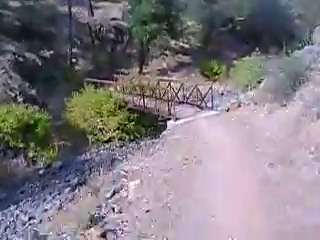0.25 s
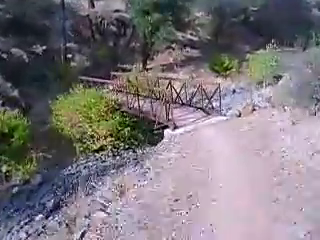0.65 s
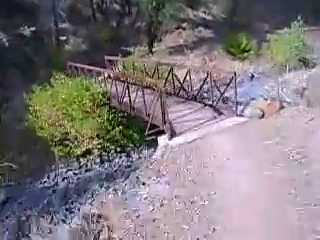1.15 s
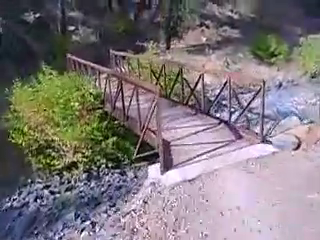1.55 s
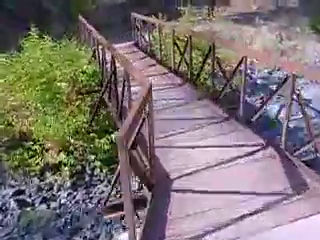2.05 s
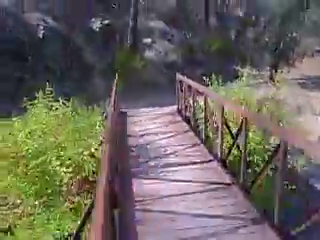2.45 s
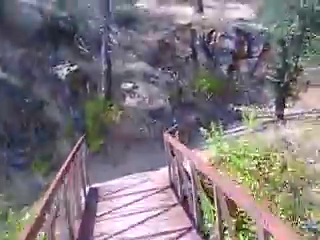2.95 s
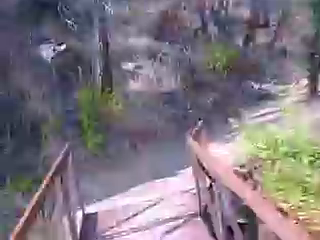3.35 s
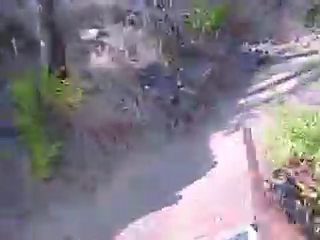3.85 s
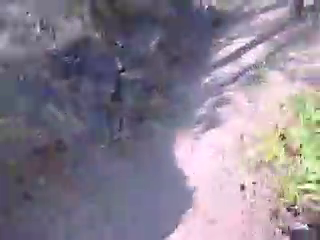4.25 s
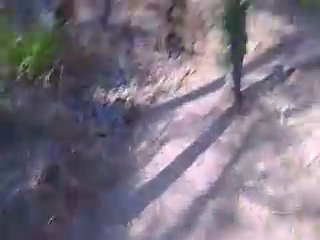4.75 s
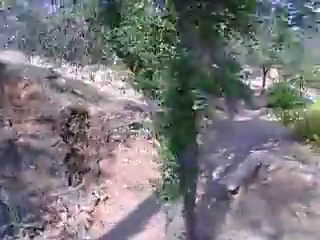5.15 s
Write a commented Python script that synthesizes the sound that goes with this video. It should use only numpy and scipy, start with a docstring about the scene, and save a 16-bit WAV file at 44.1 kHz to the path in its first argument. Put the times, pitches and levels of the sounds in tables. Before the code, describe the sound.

Heard close up outdoors from a rider's microphone, low wind buffeting runs under the gritty rumble of mountain bike tyres. A few brief, faint brake squeals and popping pebbles give way to two heavy, slightly distorted thumps as the wheels hit a plank bridge. The bike crosses with a hollow roar and irregular metallic chain clacks, bumps lightly twice more, and rolls on more quietly over dirt.

```python
"""A mountain bike in the open air, heard close up from the microphone of the rider's camera.
It rolls down a gravel path, tyres rumbling and crunching, stones snapping; the brake pad squeals briefly.
At 2.4 s it thumps onto a plank bridge, wheel after wheel, then crosses with the chain slapping the frame
and the span booming below. Near 4.7 s come two lighter thumps, and it runs out on dirt.
Wind buffets the microphone all the way; the camera sounds dull and overloads on the big blows."""
import sys
import numpy as np
from scipy import signal
from scipy.io import wavfile

SR = 44100
rng = np.random.default_rng(int(sys.argv[2]) if len(sys.argv) > 2 else 0)


def unload_audio(sound):
    """Save the sound as a 16-bit wav file, at the path given as the first command line argument."""
    columns = np.transpose(np.atleast_2d(sound))
    # keep every value between -1 and 1, then stretch to whole-number steps
    steps = np.round(np.clip(columns, -1, 1) * 32767)
    wavfile.write(sys.argv[1], SR, steps.astype(np.int16))


N = 238882

# Levels in the tables are relative; each source sets its own gain.
# tyre spectra (slow rumble, fast rumble, roar, crushed grit): f/Hz, level/dB
SLOW_RUMBLE = [(110, -22.5), (170, -1), (260, 1.5), (340, -3), (480, -4), (640, -8), (850, -18.5),
               (1500, -31)]
FAST_RUMBLE = [(130, -29.5), (200, -10), (270, -3), (350, -2), (480, -5), (640, -7), (850, -5), (1500, -26)]
ROAR_SPECTRUM = [(450, -20.5), (680, -5), (880, -2.5), (1080, -6), (1350, -9.5), (1700, -10), (2300, -18.5),
                 (3500, -26)]
GRIT_SPECTRUM = [(900, -23), (1500, 3.5), (2100, 5.5), (2800, 5), (3800, 4), (5200, 4.5), (6000, -1)]
# resonances of the singing tyre: f/Hz, level/dB, t60/s
SONG_MODES = [(833, -4, 0.028), (939, 0, 0.032), (1116, -1.5, 0.028)]
# how hard the bike rolls (braked on the slope, let go to the bridge, easing on dirt): t/s, level/dB
EFFORT = [(0, -9), (.6, -9), (1.0, -14), (1.8, -12.5), (2.27, -7), (2.55, 0.5), (3.2, -0.5), (4.1, 2),
          (4.3, -4.5), (4.78, -2), (5.15, -9.5), (5.4, -5)]
# the tyres drum louder and higher with speed: t/s, level/dB, share of fast rumble/0-1
DRUMMING = [(0, -22, 0.5), (.8, -23, 0.05), (1.8, -22, 0.22), (2.05, -17.5, .3), (2.6, -15.5, 0.9),
            (3.1, -17, 0.94), (4.25, -14, 0.9), (4.55, -17.5, 0.96), (5.0, -18, 0.8), (5.4, -20, 0.84)]
# bumps press the tyres down (+), crests unload them (-): middle t/s, length/s, load/dB
BUMPS = [(.44, 0.17, -4.5), (0.499, 0.038, 4.5), (1.0, .07, -1.5), (1.094, .12, 3), (1.716, 0.085, 5.5),
         (2.698, 0.2, 6), (2.854, .13, 5.5), (2.988, 0.1, -5), (4.277, 0.14, -2.5), (4.395, 0.063, 3.5),
         (4.497, 0.1, -2.5), (4.576, 0.12, 2.5), (5.252, 0.12, -4.5), (5.302, 0.087, 2)]
# wheels hit the bridge and bumps: t/s, level/dB, base t60/s
WHEEL_HITS = [(2.441, 7, 0.066), (2.456, 3, 0.03), (2.617, -8, 0.078), (2.640, 1.5, 0.066),
              (2.65, 5, 0.056), (2.851, -11.5, 0.077), (4.64, -10.5, 0.078), (4.673, -5.5, 0.037)]
# modes of deck and wheel: f/Hz, level/dB, t60/base t60
DECK_MODES = [(275, -18, 1.2), (323, 0, 1.17), (363, -1, 0.49), (406.6, -1.5, 1.54), (462, -2, 0.83),
              (553, 0, 1.04), (649.5, -9.5, 3.1), (706, -2, 0.77), (940, -26, 0.67), (1102, -9, 2.3),
              (1210, -8, 1.04)]
# chain and fittings strike the frame: t/s, level/dB, favoured f/Hz, ring offset/dB
CHAIN_SLAPS = [(2.443, 7, 1960, -19), (2.4653, 2, 1380, -6.5), (2.615, -1, 1460, -8.5),
               (2.6382, 5, 1420, -9), (2.7352, -3, 1660, -8), (2.824, -12, 1700, -4),
               (2.8642, -1, 1430, -6), (2.9232, -12, 2280, 3), (3.0643, -3, 2050, 7), (3.0714, 0, 1570, -5),
               (3.1731, -4, 1450, -2), (3.186, -7, 1500, -6), (3.235, 0.5, 1600, -1),
               (3.2815, -6, 1880, -3), (3.451, -2, 1580, -8.5), (3.511, 5, 3240, -12),
               (3.712, -1, 1560, -4), (3.76, -1.5, 1630, -1.5), (3.8297, -8, 1540, -15),
               (3.9426, -4, 1610, -3), (4.089, -3, 1450, -15), (4.386, -5.5, 1500, -4.5),
               (4.4606, -7.5, 1530, -4), (4.537, -6.5, 1870, -17), (4.64, -10, 1510, 0.5),
               (4.692, -2, 1380, -13), (4.806, -9, 2030, -6)]
# modes of frame and drive: f/Hz, level/dB, t60/s
FRAME_MODES = [(830, 6, 0.094), (1266, 6, 0.058), (1570, -2, 0.041), (1820, -4, 0.052), (2070, -1, .045),
               (2310, -1, .04), (2900, -15, 0.064), (3330, -8.5, 0.028), (3850, -6.5, .02),
               (4240, -6, 0.017), (5300, -11, .02)]
# the wheels push on the whole span: t/s, level/dB
SPAN_PUSHES = [(2.834, -9.5), (3.29, -7.5), (3.462, -5.5), (3.525, -8.5), (3.74, -6), (3.937, -14)]
# modes of the span: f/Hz, level/dB, t60/s
SPAN_MODES = [(108, -6.5, 0.54), (128, 1, 0.22), (156, -21, 0.04)]
# stones snap under the tyres: t/s, level/dB, base f/Hz
STONE_SNAPS = [(0.06, -12, 2080), (0.1028, -12, 1910), (0.7422, -9.5, 2150), (0.822, -15, 2620),
               (0.853, -9.5, 1880), (1.0522, -12.5, 2660), (1.1443, -16, 3200), (1.285, -9.5, 1840),
               (1.4755, -8.5, 1840), (1.5672, -13, 2100), (2.113, -8.5, 3300), (2.195, -8, 1880),
               (2.247, -11.5, 1900), (2.294, -5, 1860), (5.2755, -5, 1940)]
# the brake pad bites: t/s, length/s, level/dB, starting f/Hz
BRAKE_BITES = [(0.156, 0.11, -20, 887), (0.283, 0.086, -22.5, 850), (0.46, 0.036, -26.5, 811),
               (0.577, .085, -28.5, 817)]
# wind on the microphone: f/Hz, level/dB
WIND_SPECTRUM = [(18, -13.5), (30, -7), (50, 1.5), (85, -1.5), (130, 0.5), (190, -2.5), (300, -12),
                 (600, -32)]
# airflow at the microphone, strongest over the open creek: t/s, level/dB
AIRFLOW = [(0, -28), (.9, -27.5), (1.5, -28.5), (2.2, -27), (2.65, -23.5), (3.7, -23.5), (4.1, -25.5),
           (5.4, -28.5)]

ROAR_DB, GRIT_DB, SONG_DB = -18.5, -30.5, -1   # at 0 dB of effort; the song is relative to the roar
ROAR_FOLLOWS, GRIT_FOLLOWS, SONG_FOLLOWS = 1.06, 0.85, 1.2   # dB gained per dB of effort
RUMBLE_BUMP_SHARE, GRIT_BUMP_SHARE = 0.36, 0.87
BITE_ATTACK_S, BITE_RELEASE_S = 0.01, 0.035
SAG_HZ_PER_S, FADE_DB_PER_S = 224, 28   # pitch and level sink during a bite
CAMERA_TOP_HZ, CUTOFF_HZ = 6350, 15800


def tyres(effort_db, bump_db):
    """Just below the microphone, knobs drum on the ground and crush grit; bumps press them harder."""
    drumming_db, pace = in_time(DRUMMING)
    load = drift(86)
    rumble_db = drumming_db + RUMBLE_BUMP_SHARE * bump_db + 1.1 * load
    roar_db = ROAR_DB + ROAR_FOLLOWS * effort_db + bump_db + 1.74 * load
    grit_db = GRIT_DB + GRIT_FOLLOWS * effort_db + GRIT_BUMP_SHARE * bump_db + 1.7 * load
    return (from_db(rumble_db) * rumble(pace)
            + from_db(roar_db) * roar(effort_db)
            + from_db(grit_db) * grit())


def rumble(pace):
    """The low drumming of the knobs, shifting upwards with pace."""
    knobs = [grains(3000, spread_db=1.0), grains(3000, spread_db=2.5)]
    slow = coloured(SLOW_RUMBLE, knobs, patchy_db=3.0)
    fast = coloured(FAST_RUMBLE, knobs, patchy_db=-0.05)
    return (1 - pace) * slow + pace * fast


def roar(effort_db):
    """The tread roars; at speed and on the planks the sound gathers in a few resonances."""
    tread = [grains(4000, spread_db=0.5), grains(4000, spread_db=2.5)]
    broad = coloured(ROAR_SPECTRUM, tread, patchy_db=1.65)
    song = sum(from_db(db) * ring(grains(4000, spread_db=0.5), hz, t60) for hz, db, t60 in SONG_MODES)
    hollow = from_db(SONG_DB + SONG_FOLLOWS * effort_db)
    return (broad + hollow * rms_one(song)) / np.hypot(1, hollow)


def grit():
    """Grit gives way in sharp slips that die in milliseconds, with single grains cracking between."""
    slip_s = 0.0028
    slips = signal.lfilter([1], [1, -np.exp(-1 / (slip_s * SR))], grains(200, spread_db=3.5) ** 2)
    crunch = rms_one(np.sqrt(slips) * grains(6000, spread_db=10.5))
    crackle = crunch + 1.6 * grains(330, spread_db=2.2)
    # neighbouring bands take the crackle with opposite signs, so that they join without notches
    drives = np.array([crackle, -crackle]) + 0.9 * rng.standard_normal((2, N))
    return coloured(GRIT_SPECTRUM, drives, patchy_db=1.0)


def bump_load():
    """Extra load on the tyres in dB: each bump is one smooth swell or dip."""
    t = np.arange(N) / SR
    return sum(db * np.cos(np.pi * np.clip((t - s) / length, -.5, .5)) ** 2 for s, length, db in BUMPS)


def thumps(gain_db):
    """A wheel strikes an edge under the rider and sets deck and wheel booming."""
    out = np.zeros(N)
    for s, db, base_t60 in WHEEL_HITS:
        force, boom = contact(t60=0.1, scatter=0.51), 0
        for hz, mode_db, share in DECK_MODES:
            strength = rng.choice([-1, 1]) * from_db(mode_db + rng.normal(0, 1.6))
            boom += strength * ring(force, hz, share * base_t60)
        add(out, s, from_db(db + gain_db) * boom / np.abs(boom).max())
    return out


def clacks(crack_db, focus_db):
    """Chain and fittings slap the frame close by: a crack, and a ring favouring modes near one pitch."""
    out = np.zeros(N)
    for s, db, main_hz, ring_db in CHAIN_SLAPS:
        force, metal = contact(t60=0.022, scatter=0.91), 0
        crack = contact(t60=0.067, scatter=1.6)
        for hz, mode_db, t60 in FRAME_MODES:
            near = np.exp(-(np.log(hz / main_hz) / 0.11) ** 2)
            slack_hz = hz * (1 + .012 * rng.standard_normal())   # loose parts never sit the same twice
            strength = rng.choice([-1, 1]) * from_db(mode_db + focus_db * near + rng.normal(0, 1.8))
            metal += strength * ring(force, slack_hz, t60)
        metal /= np.abs(metal).max()
        add(out, s, from_db(db + ring_db) * metal + from_db(db + crack_db) * crack)
    return out


def span_booms(gain_db):
    """Soft, heavy pushes set the lowest modes of the bridge swinging beneath the bike."""
    push = np.zeros(N)
    for s, db in SPAN_PUSHES:
        add(push, s, from_db([db + gain_db]))
    return sum(from_db(db) * ring(push, hz, t60) for hz, db, t60 in SPAN_MODES)


def stones(gain_db, t60, pitched):
    """A pebble snaps from under the tyre: a dry crack tinted by a few very short modes."""
    out = np.zeros(N)
    for s, db, hz in STONE_SNAPS:
        force = contact(t60=0.011, scatter=1.6)
        tick = force + pitched * sum(ring(force, ratio * hz, t60) for ratio in (.85, 1.05, 1.4, 1.8))
        add(out, s, from_db(db + gain_db) * tick / np.linalg.norm(tick))
    return out


def brake(overtone_db, overtone_ratio, rough_db):
    """On the slope the pad drags on the disc: a wavering tone that sinks, and a weaker second mode."""
    out = np.zeros(N)
    waver, upper_waver = 1 + .014 * drift(98), 1 + .02 * drift(60)
    for s, length, db, start_hz in BRAKE_BITES:
        t = np.clip(np.arange(N) / SR - s, 0, length + BITE_RELEASE_S)
        envelope = np.clip(t / BITE_ATTACK_S, 0, 1) * np.clip(1 - (t - length) / BITE_RELEASE_S, 0, 1)
        hz = start_hz - SAG_HZ_PER_S * t
        tone = np.sin(2 * np.pi * np.cumsum(hz * waver) / SR)
        upper = np.sin(2 * np.pi * np.cumsum(overtone_ratio * hz * upper_waver) / SR)
        out += envelope * from_db(db - FADE_DB_PER_S * t) * (tone + from_db(overtone_db) * upper)
    return np.sqrt(2) * from_db(rough_db * drift(90)) * out


def wind(airflow_db):
    """Lumpy turbulence right on the microphone port."""
    buffeting = from_db(airflow_db + 0.65 * drift(9.1) + 3.5)
    return buffeting * coloured(WIND_SPECTRUM, rng.standard_normal((2, N)), patchy_db=0.5)


def from_db(db):
    """Decibels to gain."""
    return 10 ** (np.asarray(db) / 20)


def rms_one(x):
    """Scale to rms 1."""
    return x / np.sqrt(np.mean(x ** 2) + 1e-20)


def in_time(rows):
    """Each column of a curve at every sample."""
    s, *columns = np.transpose(rows)
    return [np.interp(np.arange(N) / SR, s, c) for c in columns]


def drift(rate):
    """A smooth random wander with spread 1, changing about rate times a second."""
    hop, settle = 40, 2000
    r = np.exp(-2 * np.pi * rate * hop / SR)
    noise = rng.standard_normal(N // hop + settle + 2)
    slow = signal.lfilter([1], [1, -2 * r, r * r], noise)[settle:]
    return np.interp(np.arange(N) / hop, np.arange(len(slow)), rms_one(slow))


def ring(force, hz, t60):
    """One mode: a unit click starts a dying sine of height 1."""
    r, w = from_db(-60 / (t60 * SR)), 2 * np.pi * hz / SR
    return signal.lfilter([0, np.sin(w)], [1, -2 * r * np.cos(w), r * r], force + 1e-18)


def coloured(spectrum, drives, patchy_db):
    """Third-octave bands fed in turn by the drives, each flickering by itself; rms 1."""
    hz, db = np.transpose(spectrum)
    edges = 2 ** (np.arange(12, 39) / 3)
    out = np.zeros(N)
    for k, (low, high) in enumerate(zip(edges, edges[1:])):
        if high > hz[0] and low < hz[-1]:
            bandpass = signal.butter(2, [low, high], "band", fs=SR, output="sos")
            band_db = np.interp(np.log(low * high) / 2, np.log(hz), db) + patchy_db * drift(24)
            out += from_db(band_db) * signal.sosfilt(bandpass, drives[k % len(drives)])
    return rms_one(out)


def grains(per_s, spread_db):
    """Random contacts, mostly small and a few large; rms 1."""
    sizes = from_db(spread_db * np.minimum(rng.exponential(1, N), 4)) * rng.choice([-1, 1], N)
    return rms_one(sizes * (rng.random(N) < per_s / SR)) + 1e-18


def contact(t60, scatter):
    """A click followed by a dying chatter of smaller touches, 0.3 s long; energy 1."""
    t = np.arange(SR * 3 // 10) / SR
    force = rng.standard_normal(len(t)) * from_db(-60 * t / t60)
    force *= scatter / np.linalg.norm(force)
    force[0] += 1
    return force / np.linalg.norm(force)


def add(track, s, sound):
    """Mix a sound in at time s."""
    start = int(s * SR)
    track[start:start + len(sound)] += sound[:N - start]


def scene():
    """One microphone travels with the bike: everything is close, in the open air."""
    rolling = tyres(*in_time(EFFORT), bump_load())
    squeal = brake(overtone_db=-9.5, overtone_ratio=1.23, rough_db=1.5)
    bridge = thumps(gain_db=6.0) + span_booms(gain_db=-6.0)
    rattle = clacks(crack_db=9.0, focus_db=11.5) + stones(gain_db=10.5, t60=0.0019, pitched=0.12)
    return (rolling + squeal + bridge + rattle + wind(*in_time(AIRFLOW)))[None]


def record(dry):
    """The camera overloads and dulls the treble; peaks that still overshoot are cut flat and spit."""
    overloaded = np.clip(dry, -.68, .68)
    dull = signal.sosfilt(signal.cheby2(16, 70, CAMERA_TOP_HZ, fs=SR, output="sos"), overloaded)
    flat = np.clip(dull, -.7, .7)
    return signal.sosfilt(signal.ellip(10, .1, 80, CUTOFF_HZ, fs=SR, output="sos"), flat)


dry = scene()
out = record(dry)
unload_audio(out)
```